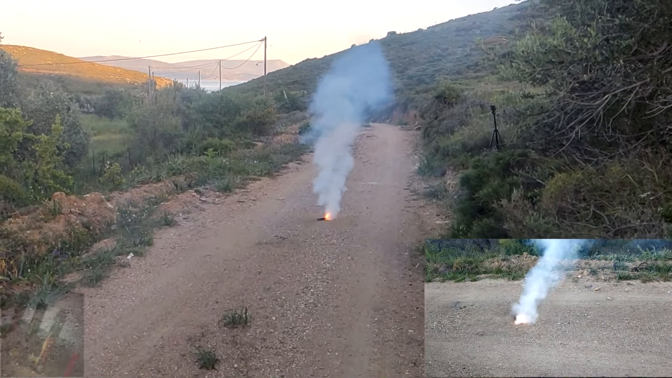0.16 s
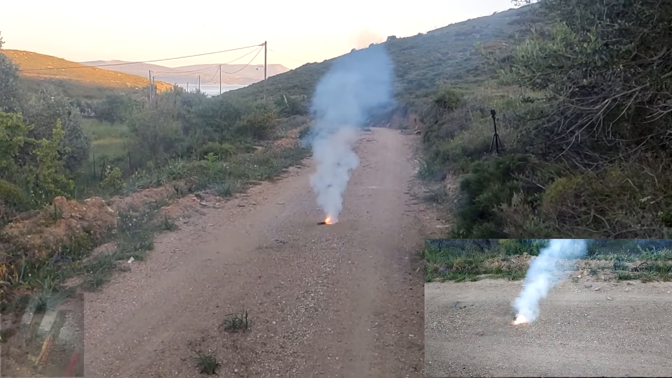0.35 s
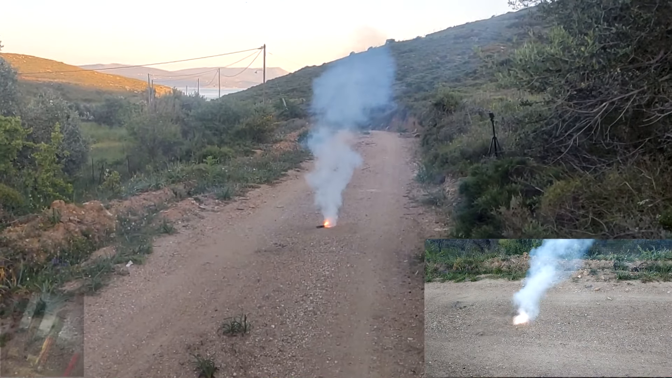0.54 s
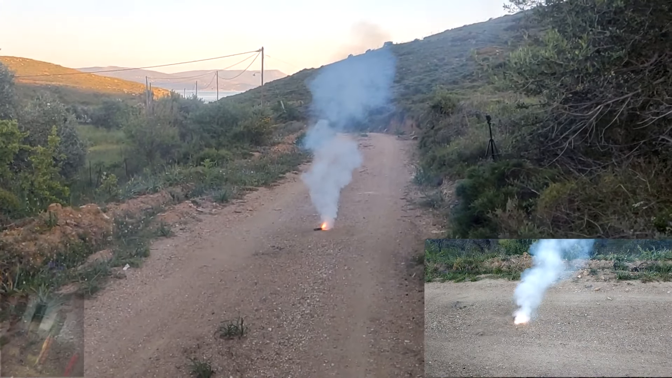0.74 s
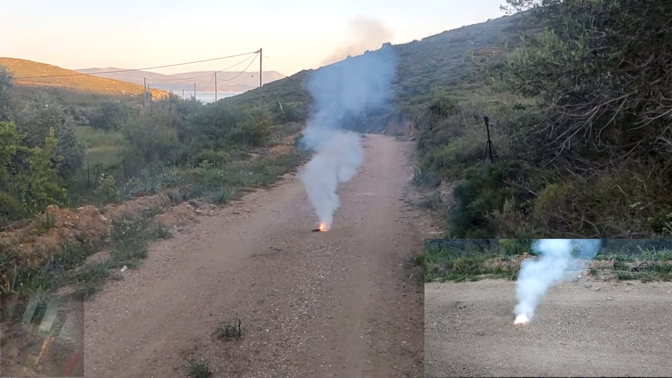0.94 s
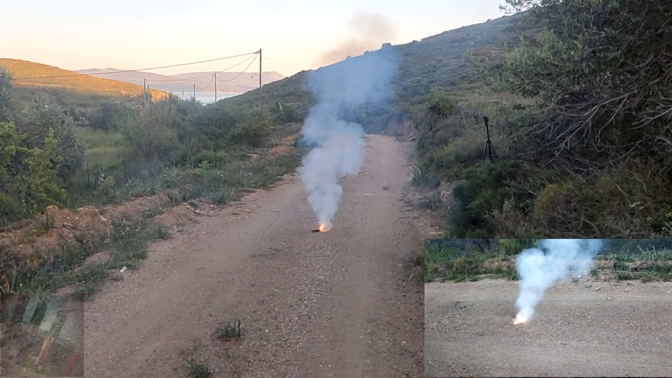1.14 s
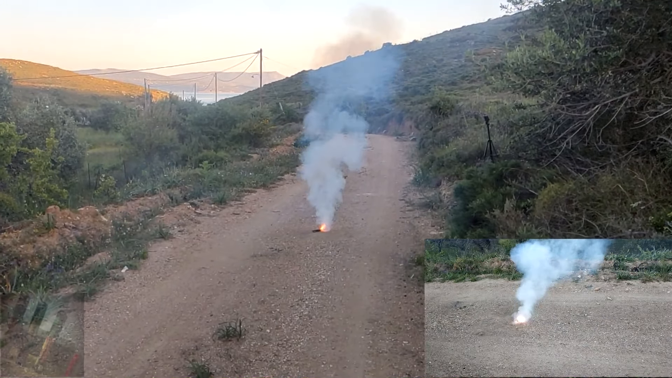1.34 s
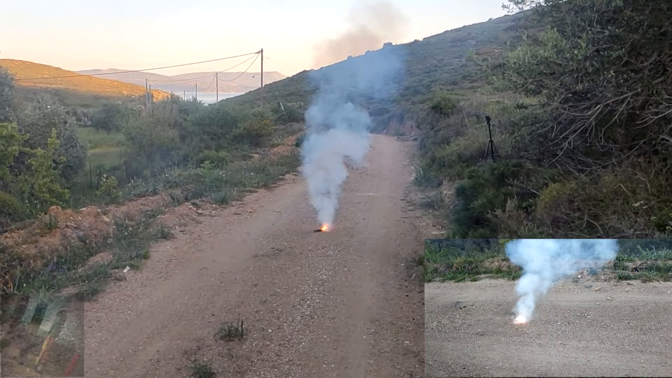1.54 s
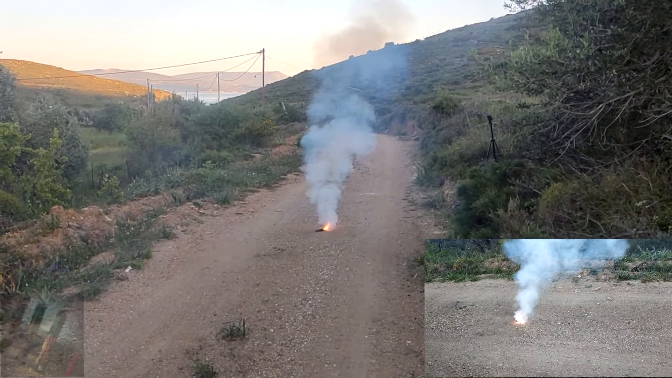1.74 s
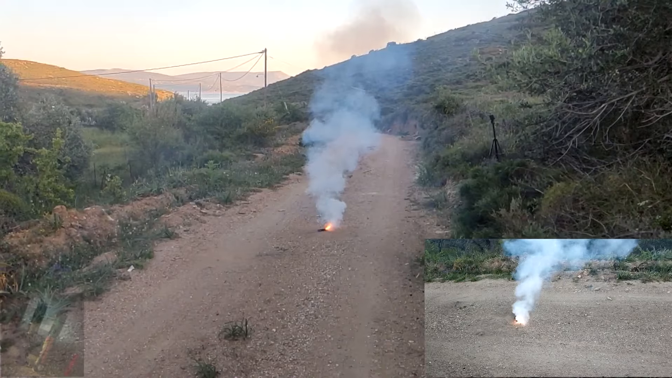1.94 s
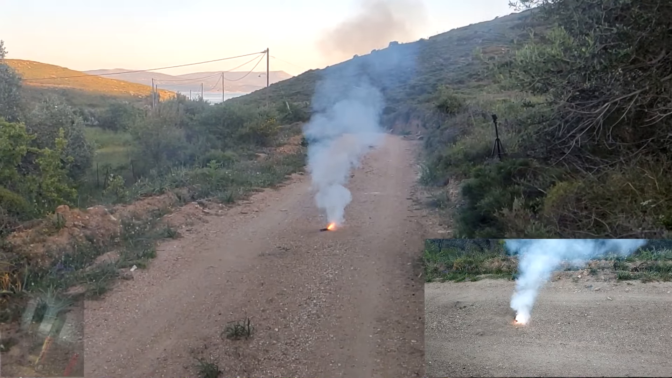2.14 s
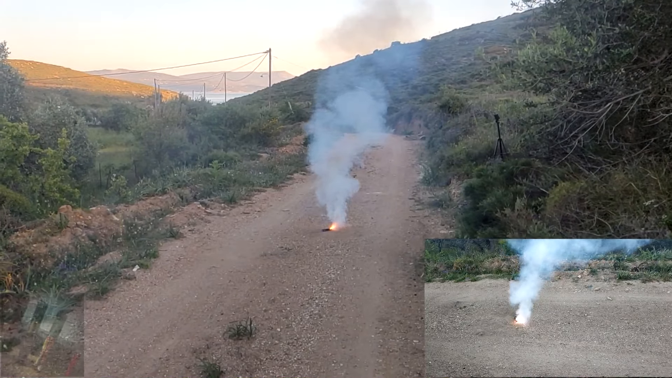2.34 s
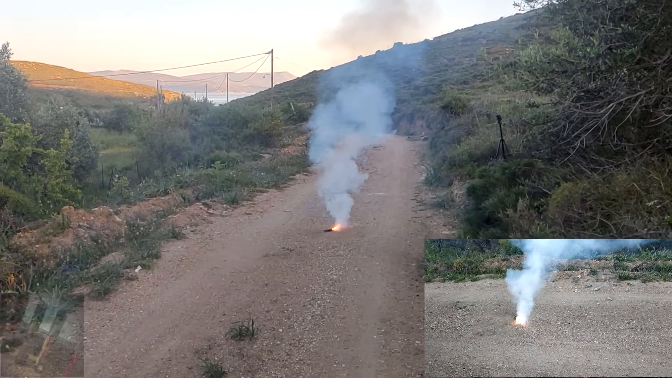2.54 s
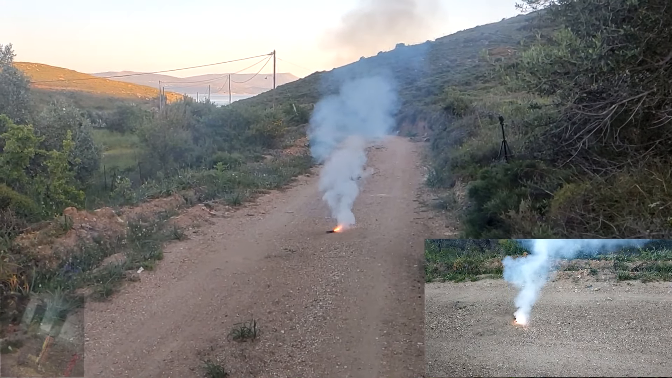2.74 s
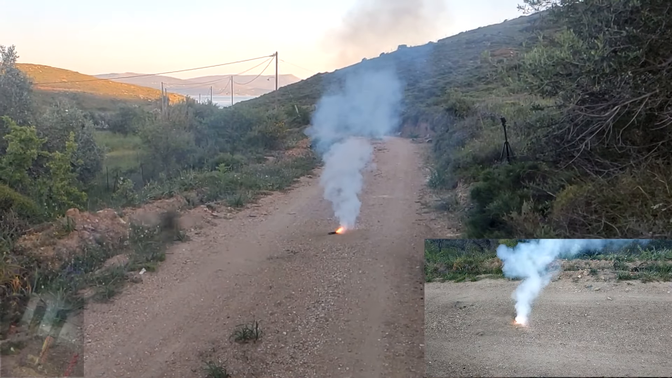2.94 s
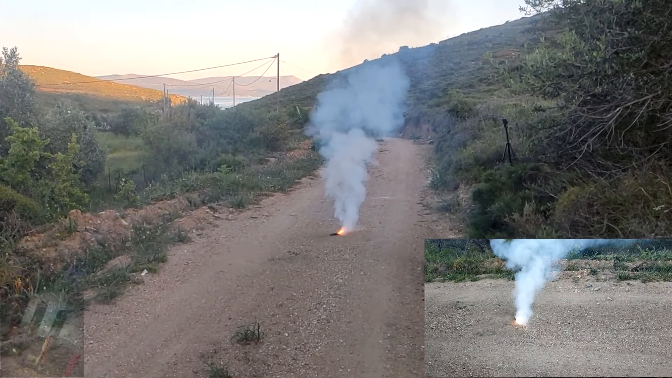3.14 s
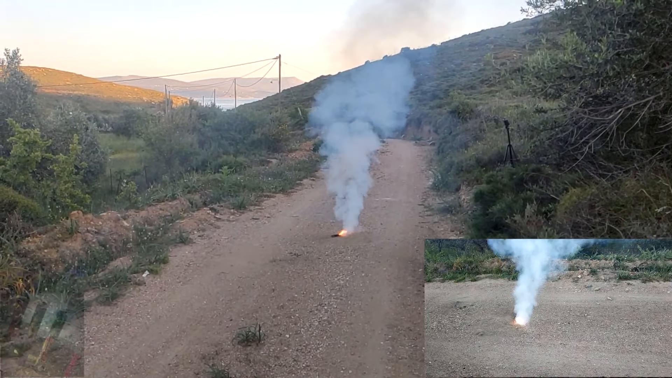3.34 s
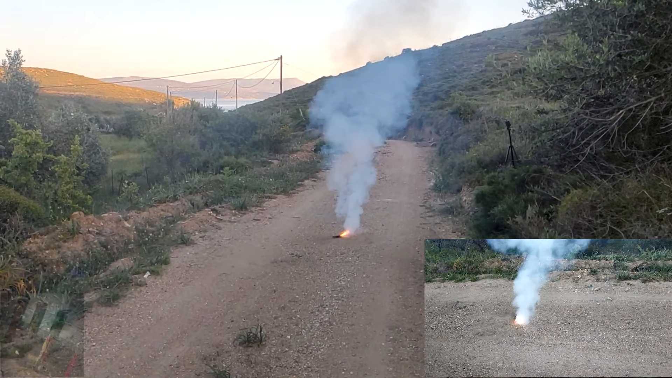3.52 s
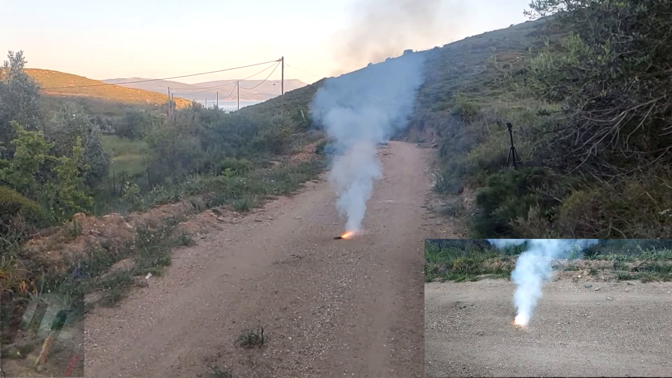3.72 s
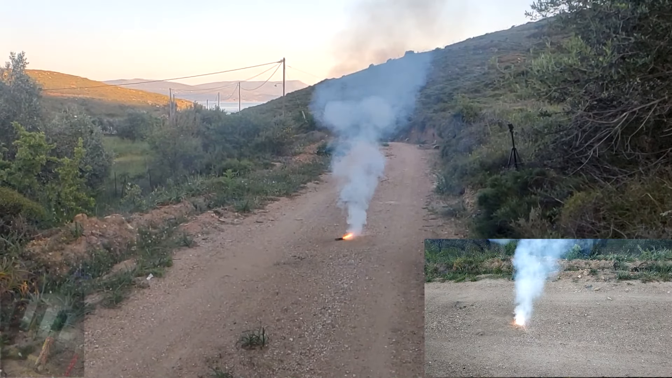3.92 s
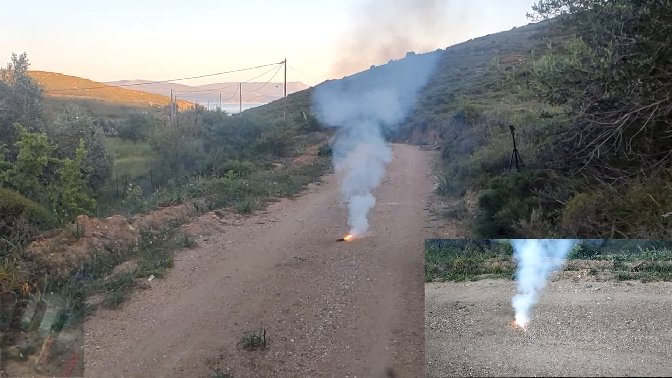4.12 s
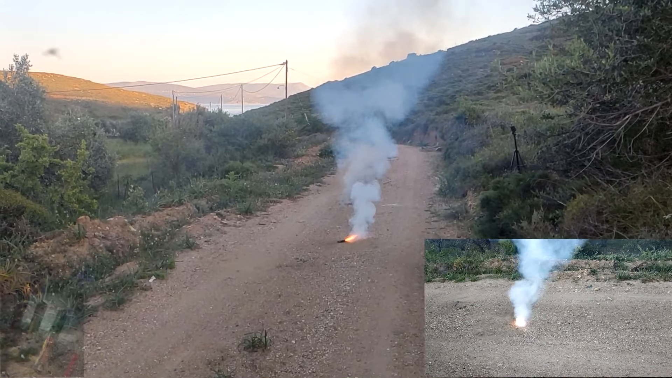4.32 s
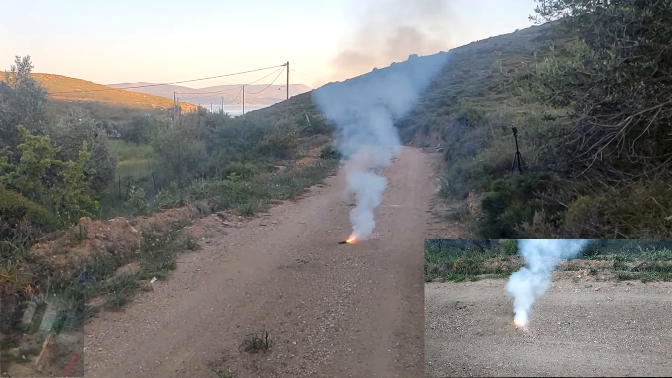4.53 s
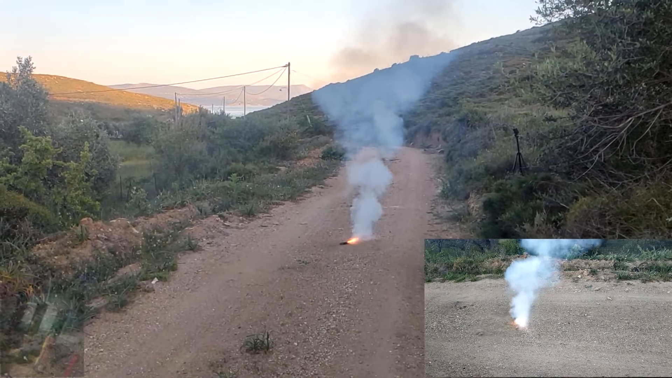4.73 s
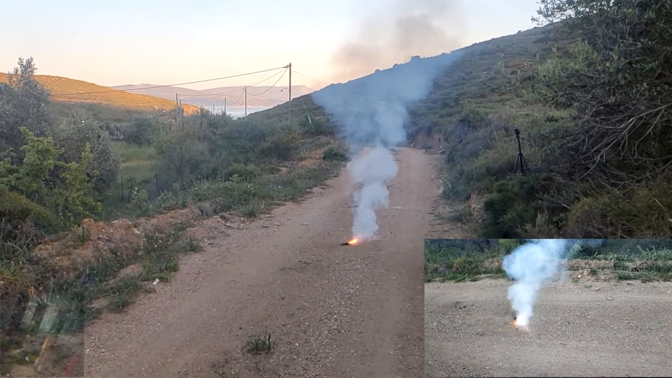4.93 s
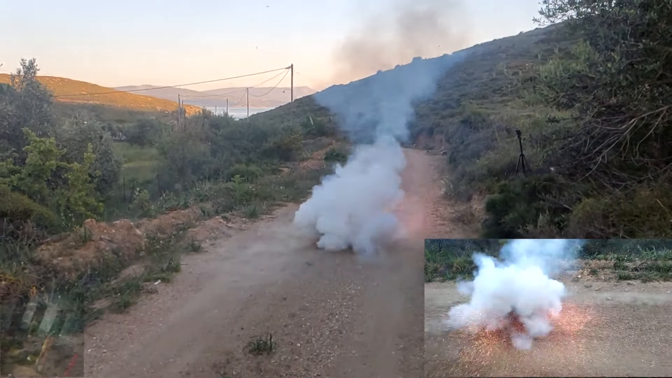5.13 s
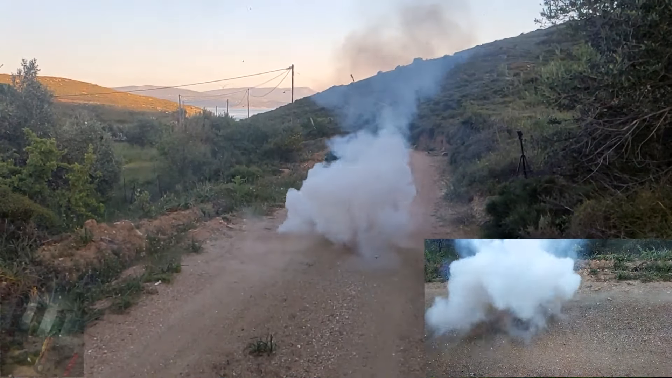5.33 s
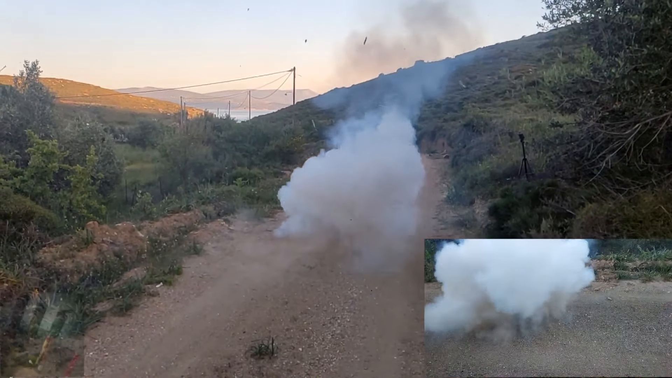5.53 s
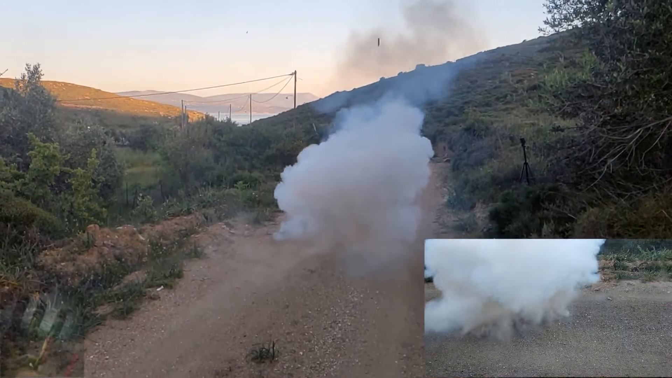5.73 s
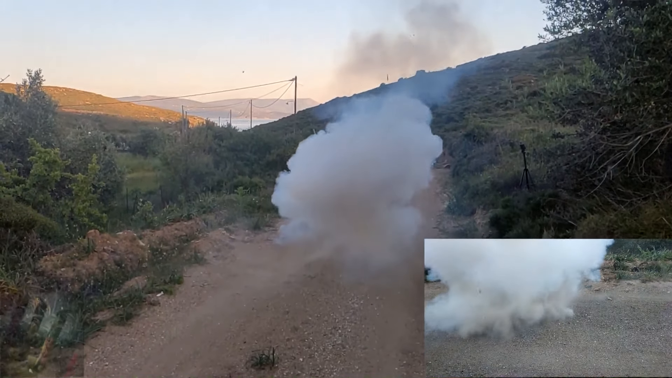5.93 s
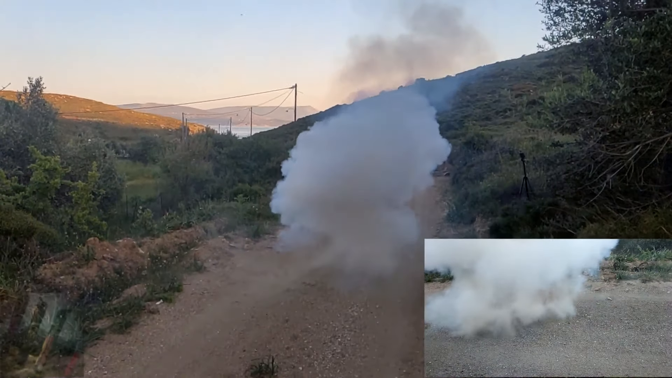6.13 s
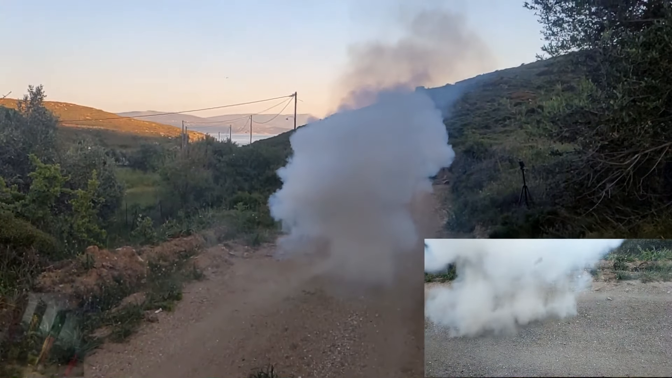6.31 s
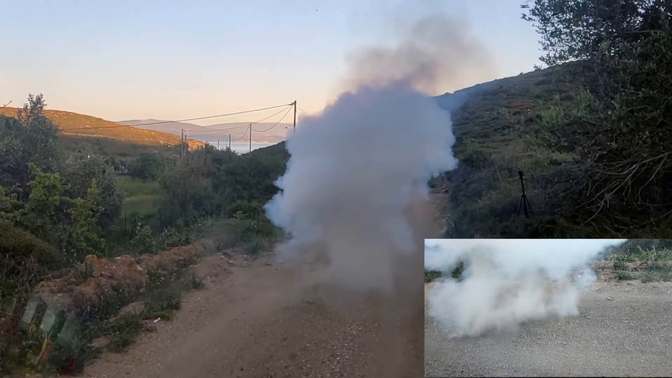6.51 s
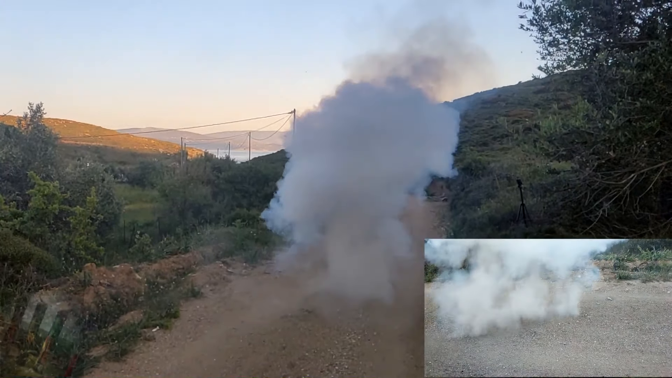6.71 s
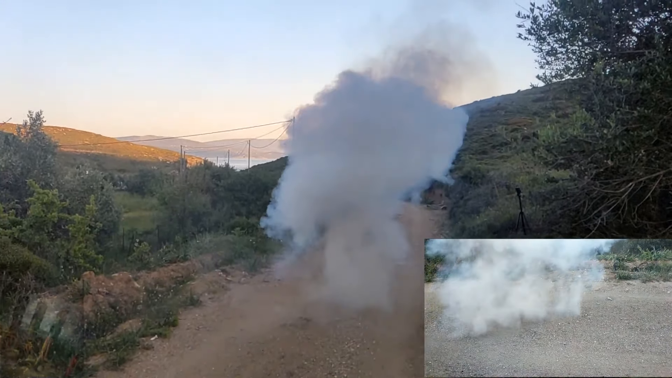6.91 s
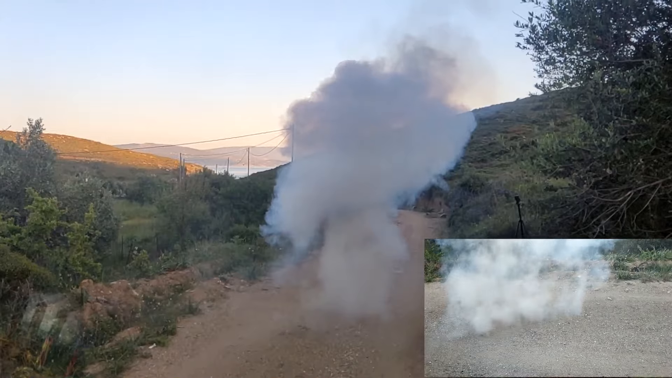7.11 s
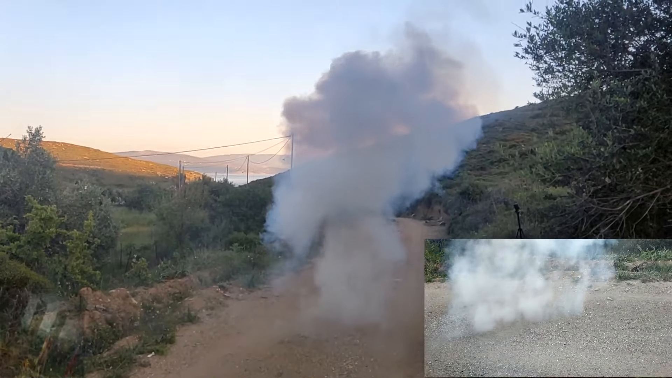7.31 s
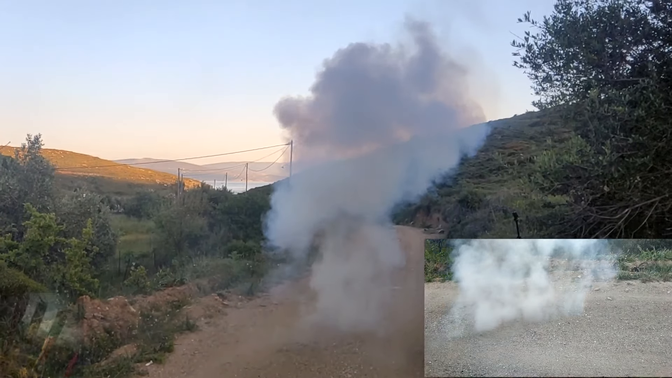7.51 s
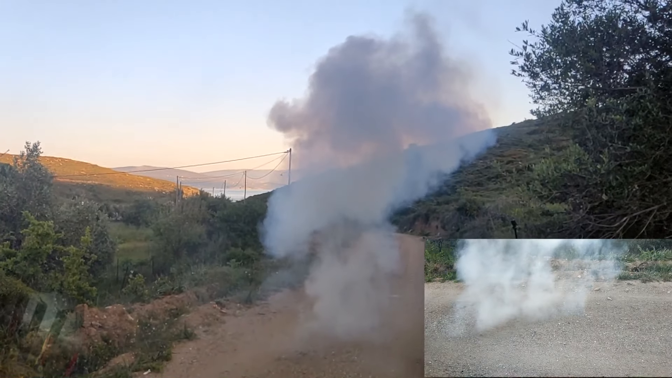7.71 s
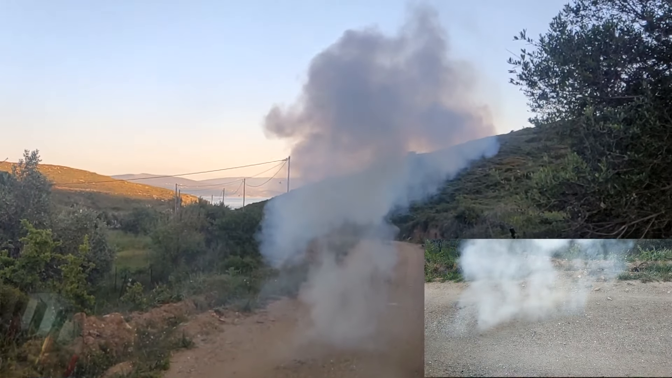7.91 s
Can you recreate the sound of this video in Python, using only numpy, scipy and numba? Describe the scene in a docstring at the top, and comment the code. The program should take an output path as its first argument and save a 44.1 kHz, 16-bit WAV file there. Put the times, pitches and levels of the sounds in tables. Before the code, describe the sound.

From the start, a firecracker fuse burns on a dirt road with a quiet, flickering hiss and scattered sharp little spits, over a low open-air rumble. A soft gust brushes the microphone near 1.2 seconds. A faint cricket scrapes a thin, very high pulsing phrase on the right from 1.8 to 3.3 seconds. The spits grow more frequent after 3 seconds. At 5.1 seconds the hiss ends in one very loud, sharp bang that overloads the phone microphone. A strong echo slaps back from the slopes around 5.5 seconds and another near 6, wrapped in a fading boom. From about 5.8 seconds, debris ticks onto the ground and fine grit sifts through bushes, while the cricket repeats its phrase until 7.2. A faint low rumble swells near 6.8 seconds, and distant hills return a soft, thunderlike roll that dies down around 8 seconds.

```python
"""A big firecracker on a dirt road between hills: its fuse hisses and spits for five seconds, then it bursts.
The shock overloads a phone's two microphones, scatters off road and scrub, slaps back from the slopes
and rolls in from far hills. A faint low rumble swells as the microphones settle.
Debris ticks down and grit sifts through the bushes.
Over a low open-air rumble, a bush cricket scrapes two thin, high phrases with its wings."""
import sys
import numpy as np
from scipy import signal
from scipy.fft import rfft, irfft
from scipy.io import wavfile
from numba import njit

SR = 44100
rng = np.random.default_rng(int(sys.argv[2]) if len(sys.argv) > 2 else 0)


def pcm_store(signal):
    """Save signal as 16-bit PCM."""
    levels = np.round(np.clip(np.atleast_2d(signal), -1, 1) * 32767)
    wavfile.write(sys.argv[1], SR, levels.astype(np.int16).T)


N = 355446
T = np.arange(N) / SR
BANG_S = 5.122


def undb(db):
    """Decibels to gain."""
    return 10 ** (np.asarray(db) / 20)


def unit(x):
    """Scale to rms 1."""
    return x / np.sqrt(np.mean(x ** 2))


def walk(rate_hz):
    """Random wander, spread near 1."""
    knots = rng.standard_normal(int(N / SR * rate_hz) + 2)
    return np.interp(T * rate_hz, np.arange(len(knots)), knots)


def noise(apart):
    """White noise, partly shared by the two channels."""
    return rng.standard_normal(N) + apart * rng.standard_normal((2, N))


def convolve(x, response):
    """Both channels through an impulse response."""
    return signal.fftconvolve(x, np.atleast_2d(response), axes=1)[:, :N]


def colour(x, points, size=8192):
    """Minimum-phase filter of unit energy from (freq_hz, level_db) points."""
    hz, db = np.transpose(points)
    bins_hz = np.arange(size // 2 + 1) * SR / size
    outline_db = np.interp(np.log(bins_hz + 1), np.log(hz), db)
    cepstrum = irfft(np.log(undb(outline_db)))
    cepstrum[1:size // 2] *= 2
    cepstrum[size // 2 + 1:] = 0
    response = irfft(np.exp(rfft(cepstrum)))
    return convolve(x, response / np.linalg.norm(response))


@njit
def lowpass(x, edge_hz):
    """Two-pole low-pass with a moving edge."""
    out = np.empty_like(x)
    for channel in range(2):
        band, low = 0., 0.
        for i in range(x.shape[1]):
            g = np.tan(np.pi * min(edge_hz[i] / SR, .45))
            v = (band + g * (x[channel, i] + 1e-18 - low)) / (1 + g * (g + np.sqrt(2)))
            out[channel, i] = low + g * v
            band, low = 2 * v - band, low + 2 * g * v
    return out


def clicks(times_s, sizes, late_ms=0, pan_db=0):
    """Impulses at two microphones; late_ms and pan_db are left relative to right."""
    out = np.zeros((2, N))
    for channel, side in enumerate((1, -1)):
        at = np.round((times_s + side * late_ms / 2000) * SR).astype(int)
        np.add.at(out[channel], at % N, sizes * undb(side * pan_db / 2))
    return out


def scatter(rate_hz, spread_db, late_ms, fan_ms, max_count=60000):
    """Random impulses of uneven size from a fan of directions."""
    when, polarity = rng.random((max_count, 2))[:int(rate_hz * N / SR)].T
    size, direction = rng.standard_normal((max_count, 2))[:len(when)].T
    sizes = np.sign(polarity - .5) * undb(spread_db * np.clip(size, -2, 2))
    return clicks(when * N / SR, sizes, late_ms + fan_ms * direction)


def smear(x, t60_s, wet_db):
    """Add the short diffuse tail of rough ground."""
    tail = rng.standard_normal((2, SR // 2)) * np.exp(-np.log(1000) * T[:SR // 2] / t60_s)
    return x + undb(wet_db) * convolve(x, tail / np.linalg.norm(tail[0]))


def swell(peak_s, rise_s, fade_s):
    """Exponential rise to 1, then decay."""
    return np.exp(-np.maximum((peak_s - T) / rise_s, (T - peak_s) / fade_s))


def envelopes(rows):
    """Bass and upper envelopes of overlapping swells; powers add."""
    bass, upper = 0, 0
    for peak_s, db, rise_s, fade_s, bass_db in rows:
        power = (undb(db) * swell(peak_s, rise_s, fade_s)) ** 2
        bass += power * undb(bass_db) ** 2
        upper += power
    return np.sqrt(bass), np.sqrt(upper)


# snap spectra: freq_hz, level_db
SNAP_EDGE = [(1500, -25), (4500, -2.5), (7500, 4.5), (11000, -1), (15000, -8)]
SNAP_BODY = [(200, -15), (800, -2.5), (2500, 0), (4800, 5), (7000, 4.5), (12000, -19.5)]


def snaps(rows, t60_s, wet_db):
    """Tiny snaps: sharp edge, fuller body, ground scatter."""
    start_s, db, body_db = np.transpose(rows)
    pan_db = -1 + .7 * rng.standard_normal(len(start_s))
    edge = colour(clicks(start_s, undb(db), pan_db=pan_db), SNAP_EDGE)
    body = colour(clicks(start_s, undb(db + body_db)), SNAP_BODY)
    return smear(edge + body, t60_s, wet_db)


# burn spectra: freq_hz, level_db
FLAME = [(200, -17), (300, 4), (400, -6), (560, 3), (850, -11.5), (1200, -10.5), (1900, -29.5),
         (4000, -20.5)]
GAS = [(1200, -19), (2300, -6), (3100, -5.5), (4400, 0), (5600, 0.5), (8000, -28), (12000, -27.5)]
JET = [(3500, -27.5), (5300, -7.5), (6300, -1), (6900, 1), (7500, -5.5), (8300, 0.5), (9300, -9.5),
       (11000, -6), (14000, -12)]
# loudest sparks: start_s, level_db, body_vs_edge_db
SPITS = [(0.1118, -22, -11), (1.1902, -24, -4.5), (1.3112, -25.5, -4.5), (1.3982, -21.5, -4),
         (1.497, -27, -3.5), (2.1196, -25.5, -4.5), (2.3784, -23.5, -9.5), (2.744, -27, -5.5),
         (2.9582, -31, -1), (3.2101, -26, 3), (3.3945, -24, -2), (3.493, -27.5, -3.5), (3.6135, -27.5, -4),
         (3.6745, -28.5, -4), (3.9374, -28.5, -3), (3.9854, -24, -2.5), (4.087, -27, -3.5),
         (4.2335, -30.5, 1), (4.2792, -14.5, -4), (4.358, -19, -3), (4.4642, -23.5, -1), (4.6394, -24, 0.5),
         (4.869, -20.5, 2), (4.9363, -28, -3), (5.0054, -25, 1.5)]


def fuse():
    """The fuse spits sparks and burns down into the case: the jet's hiss sinks, the flame grows."""
    flicker = undb(.5 * walk(6.4) + .73 * walk(4.8) + 2 * walk(60))
    flame = undb(-65.5 + 1.6 * T) * unit(colour(noise(apart=.31), FLAME))
    gas = undb(-65.5 + .55 * T) * unit(colour(noise(apart=.82), GAS))
    jet = undb(-57 - 1.4 * T) * unit(colour(noise(apart=1), JET))
    grains = unit(colour(scatter(rate_hz=45, spread_db=4, late_ms=0, fan_ms=.034), SNAP_EDGE))
    sparks = unit(colour(scatter(rate_hz=9, spread_db=6, late_ms=0, fan_ms=.048), SNAP_BODY))
    burn = flame + flicker * (gas + jet) + undb(-66) * grains + undb(-81 + 2.5 * T) * sparks
    burn *= undb([[.4], [-.4]])  # jet blows slightly left
    return burn * (T < BANG_S) + undb(-1) * snaps(SPITS, t60_s=.016, wet_db=-2)


# open-country spectrum: freq_hz, level_db
AIR = [(12, 10), (25, 0), (50, -4.5), (110, -4.5), (185, -2.5), (300, -12.5), (420, -19), (900, -27.5),
       (2000, -27.5), (6000, -37), (14000, -51)]


def air(rumble_db=-52.5, gust_db=-44, gust_s=1.238, gust_width_s=.041):
    """Wandering open-air rumble; one soft gust brushes the microphones."""
    rumble = undb(rumble_db + .8 * walk(3.9)) * unit(colour(noise(apart=.45), AIR))
    gust = unit(colour(noise(apart=.74), [(10, -24.5), (28, 7), (65, 2.5), (120, -10), (400, -48.5)]))
    return rumble + undb(gust_db) * np.exp(-((T - gust_s) / gust_width_s) ** 2) * gust


# cricket phrases: start_s, end_s, first_gap_s, level_db
PHRASES = [(1.774, 3.27, .1712, -54), (5.827, 7.17, .1752, -53.5)]


def cricket(tooth_hz=182, teeth=12, gap_growth_s=.0012, opening_lead_s=.04, opening_db=-5):
    """Wings open with a faint scrape and close over a run of file teeth; each phrase slows."""
    drive = np.zeros(N)
    for start_s, end_s, gap_s, phrase_db in PHRASES:
        k = np.arange((end_s - start_s) / gap_s)
        strokes_s = start_s + k * gap_s + gap_growth_s * k ** 2 / 2
        for stroke_s in strokes_s[strokes_s < end_s]:
            db = phrase_db + 1.52 * rng.standard_normal()
            teeth_s = (np.arange(teeth) + .024 * rng.standard_normal(teeth)) / tooth_hz
            sizes = undb(db + 1.5 * rng.standard_normal(teeth) - np.linspace(0, 4, teeth))
            drive[((stroke_s + teeth_s) * SR).astype(int)] += sizes
            drive[int((stroke_s - opening_lead_s) * SR)] += undb(db + opening_db)
    rasp = signal.lfilter([1], [1, -np.exp(-1 / (.00152 * SR))], drive)
    spectrum = [(10500, -57), (11900, -.5), (12700, -3.5), (13900, 11), (14400, -9.5), (15500, -18.5)]
    wing = unit(colour(noise(apart=1), spectrum))
    song = smear(rasp * wing, t60_s=.17, wet_db=-3)  # blurred by bushes
    return song * undb([[3], [8]])  # sits to the right


# direct and reflected fronts: start_s, level_db, push_ms, edge_hz, left_late_ms
SHOCKS = [(5.122, 8.5, 1.57, 9000, 0.318), (5.127, -0.5, 1.9, 3000, 0.246), (5.445, -6, 0.33, 2500, 0.41),
          (5.5084, 5.5, 1.015, 700, 0.8), (5.5121, 7.5, 0.75, 700, 0.537), (5.519, 0.5, 0.486, 1200, 0.43),
          (5.539, 4, 0.374, 4000, 0.49), (5.877, -5.5, 0.596, 1610, 0.108),
          (6.0376, -12, 0.345, 3500, 0.38), (6.0516, -3.5, 0.413, 3494, 0.412),
          (6.0549, 3, 0.26, 3160, 0.422), (6.0716, -1.5, 0.317, 1300, 0.403)]


def shocks():
    """Each front is a sudden push and a longer suction; distance rounds its edge."""
    out = np.zeros((2, N))
    for start_s, db, push_ms, edge_hz, late_ms in SHOCKS:
        age = T[:SR // 10] * 1000 / push_ms
        wave = signal.lfilter(*signal.butter(2, edge_hz, fs=SR), (1 - age) * np.exp(-age))
        for channel, side in enumerate((1, -1)):
            at = int((start_s + side * late_ms / 2000) * SR)
            out[channel, at:at + len(wave)] += undb(db) * wave
    return smear(out, t60_s=.23, wet_db=-7)


# swells after the burst: peak_s, level_db, rise_s, fade_s, extra_bass_db
# slope echoes, except the last row: a faint low rumble as the overloaded microphones settle
SWELLS = [(5.29, -18.5, 0.076, 0.31, 3), (5.44, -0.5, 0.0606, 0.0943, -0.5), (5.53, -4, 0.071, 0.0504, 1.5),
          (5.7, -5, 0.103, 0.046, 1.5), (5.84, -3.5, 0.15, 0.228, 4), (6.08, -8, 0.07, 0.154, -14.5),
          (6.21, -10, 0.096, 0.334, 6.5), (6.82, -23, .3, 0.089, 17)]
# reflection spectra: freq_hz, level_db
BANKS = [(15, -23.5), (35, -7), (60, 0), (110, -2), (185, 2), (280, -1.5), (400, -15), (900, -38.5)]
ROCKS = [(130, -19.5), (280, 1), (420, -1.5), (640, 2.5), (900, -5), (1500, -5), (2400, -13), (4000, -18),
         (8000, -37.5)]
SCRUB = [(800, -6.5), (2000, -1.5), (3500, -2.5), (6000, -2.5), (8500, 0), (10800, -1), (12200, -3),
         (14000, -8.5)]


def slopes_and_rumble(road_hold_s=.011, road_fade_s=.06445):
    """Road and slopes scatter the shock, banks the bass, scrub the treble; a faint rumble follows."""
    age_s = np.maximum(T - BANG_S, 0)
    road = np.exp(-np.maximum(age_s - road_hold_s, 0) / road_fade_s)
    bass, upper = (np.hypot(road, envelope) for envelope in envelopes(SWELLS))
    banks = unit(colour(scatter(rate_hz=1200, spread_db=1, late_ms=.12, fan_ms=.1), BANKS))
    rocks = unit(colour(scatter(rate_hz=2200, spread_db=2, late_ms=.3464, fan_ms=.23), ROCKS))
    scrub = unit(colour(scatter(rate_hz=7000, spread_db=1, late_ms=.27, fan_ms=.27), SCRUB))
    # longer paths lose level and treble
    banks_hz = 480 / (1 + 3.8 * age_s)
    scrub_hz = 19000 / (1 + 3.486 * np.minimum(age_s, .33))
    boom = undb(-9 - 14.2 * age_s) * lowpass(banks, banks_hz)
    clatter = undb(-11 - 19.55 * age_s) * rocks
    rustle = undb(-7 - 40.72 * age_s) * lowpass(lowpass(scrub, scrub_hz), scrub_hz)
    return (bass * boom + upper * (clatter + rustle)) * (T >= BANG_S)


# hillside slaps: start_s, level_db, centre_hz, fade_s
SLAPS = [(5.705, -24.5, 1070, 0.04), (5.84, -18, 946, 0.0194), (6.056, -26, 561, 0.0424),
         (6.162, -30, 790, 0.0118), (6.215, -32, 859, 0.0096), (6.318, -38, 692, 0.0141),
         (6.555, -42.5, 642, 0.0197), (6.801, -41.5, 624, 0.014), (6.997, -41.5, 589, 0.0089),
         (7.317, -45.5, 478, 0.024), (7.368, -37, 386.2, 0.0252), (7.748, -43.5, 575, .015)]


def slaps(band_ratio=1.283):
    """A broken hillside returns the shock as one front and a short, hollow cluster."""
    cluster = unit(scatter(rate_hz=5200, spread_db=4, late_ms=.2, fan_ms=.022))
    out = np.zeros((2, N))
    for start_s, db, hz, fade_s in SLAPS:
        front = clicks(np.array([start_s]), np.sqrt(fade_s * SR / 2), late_ms=.22)
        tail = (T > start_s) * np.exp(-np.abs(T - start_s) / fade_s) * cluster
        band = signal.butter(2, [hz / band_ratio, hz * band_ratio], "band", fs=SR)
        out += undb(db) * np.sqrt(SR / (4 * hz)) * signal.lfilter(*band, front + tail)
    return out


# landings: start_s, level_db, body_vs_edge_db
DEBRIS = [(5.8007, -23, -12.5), (5.8923, -26, 3), (6.1508, -27.5, -5.5), (6.2703, -28, -11.5),
          (6.3213, -39, -9.5), (6.505, -43.5, -12), (6.5974, -31.5, 3), (6.6239, -40, 0), (6.7194, -41, -5),
          (6.898, -33, -13), (7.056, -42, -12.5), (7.281, -33.5, -1), (7.6578, -35, -17.5)]
# grit spectrum: freq_hz, level_db
GRIT = [(2000, -24), (5000, -8.5), (8500, -7.5), (11000, -1), (14000, -1.5)]


def debris(grit_db=-61.5):
    """Larger bits tick on the road; fine grit sifts through the bushes."""
    fall = undb(grit_db) * swell(peak_s=6.3, rise_s=.4, fade_s=.97) * (T >= BANG_S)
    grit = unit(colour(scatter(rate_hz=900, spread_db=2.5, late_ms=0, fan_ms=.3), GRIT))
    return fall * grit + snaps(DEBRIS, t60_s=.04, wet_db=1)


# far-hill echoes: peak_s, level_db, rise_s, fade_s, extra_bass_db
HILLS = [(6.88, -48, 0.081, 0.45, -10), (7.1, -48.5, 0.1014, 0.58, 3), (7.335, -45.5, 0.079, 0.088, 5.5),
         (7.57, -57, 0.038, 0.18, 8), (7.83, -52, 0.16, 0.345, 4.5), (7.96, -62, .04, .12, 13.5)]
# reflection spectra: freq_hz, level_db
FLANKS = [(40, 1.5), (130, -10.5), (215, 2.5), (290, 1), (380, -3), (520, -16), (1000, -55.5)]
CRAGS = [(300, -12.5), (480, -1), (650, 0), (950, -6.5), (1600, -12.5), (2600, -17), (5000, -37.5)]


def hills():
    """Far hills return a grainy roll that sinks like thunder."""
    bass, upper = envelopes(HILLS)
    crags = scatter(rate_hz=1600, spread_db=3, late_ms=.41, fan_ms=.16)
    flanks = scatter(rate_hz=640, spread_db=1, late_ms=.4, fan_ms=.17)
    return bass * unit(colour(flanks, FLANKS)) + upper * unit(colour(crags, CRAGS))


def scene():
    """Fuse, countryside, burst, echoes and debris."""
    return fuse() + air() + cricket() + shocks() + slopes_and_rumble() + slaps() + debris() + hills()


# microphone port cavities, left then right: pitch_hz, width_hz, gain_db
PORTS = [(10513, 1200, 9.5), (8402, 1258, 12)]


def record(dry, top_hz=14400):
    """Each port rings at its own pitch; the burst overloads the band-limited input."""
    heard = np.empty_like(dry)
    for channel, (hz, width_hz, db) in enumerate(PORTS):
        ring = signal.lfilter(*signal.iirpeak(hz, hz / width_hz, fs=SR), dry[channel])
        heard[channel] = dry[channel] + undb(db) * ring
    clipped = heard / (1 + heard ** 4) ** (1 / 4)
    band_limit = signal.ellip(8, .2, 70, top_hz, fs=SR, output="sos")
    return np.clip(signal.sosfilt(band_limit, clipped), -1, 1)


dry = scene()
out = record(dry)
pcm_store(out)
```